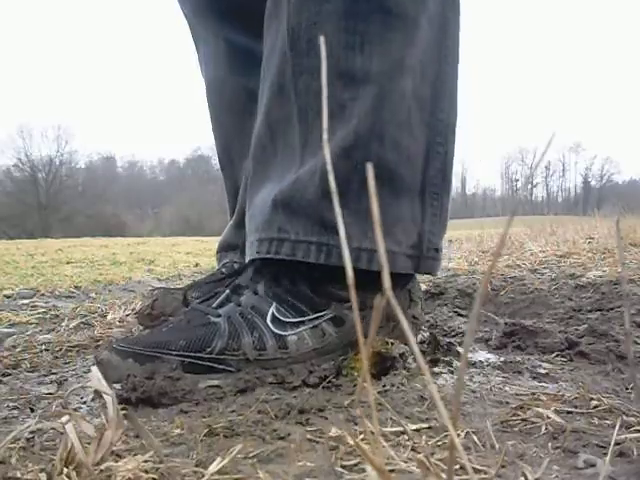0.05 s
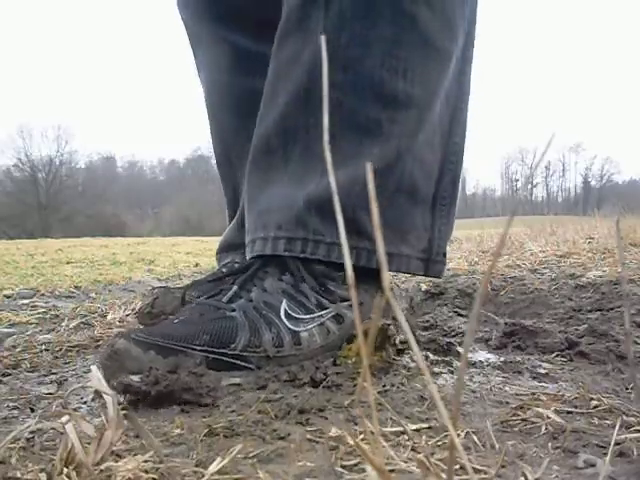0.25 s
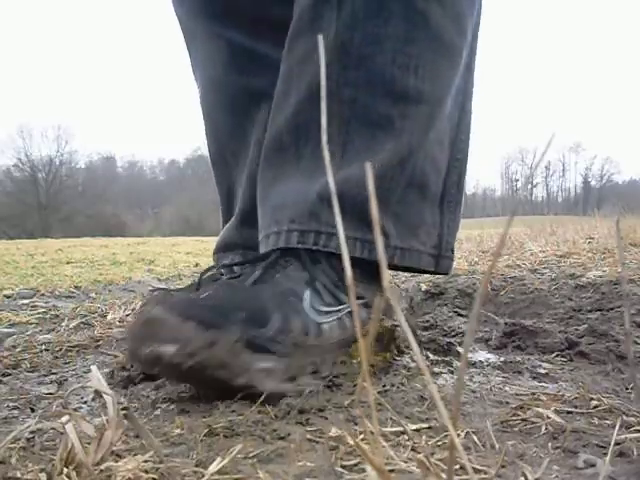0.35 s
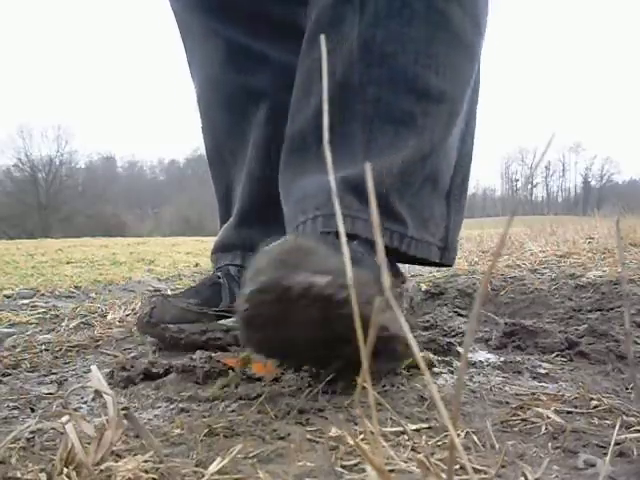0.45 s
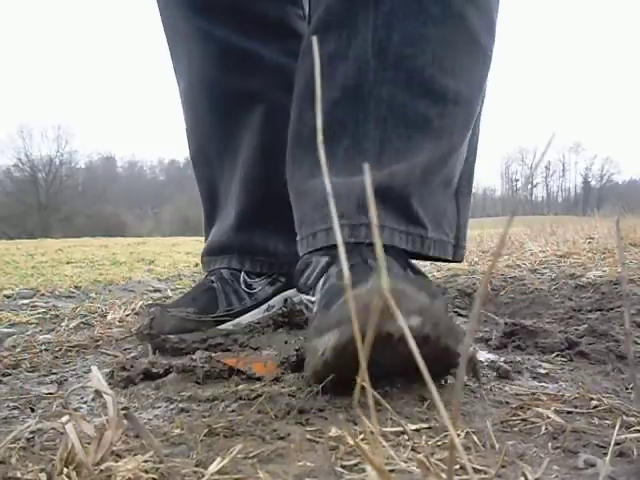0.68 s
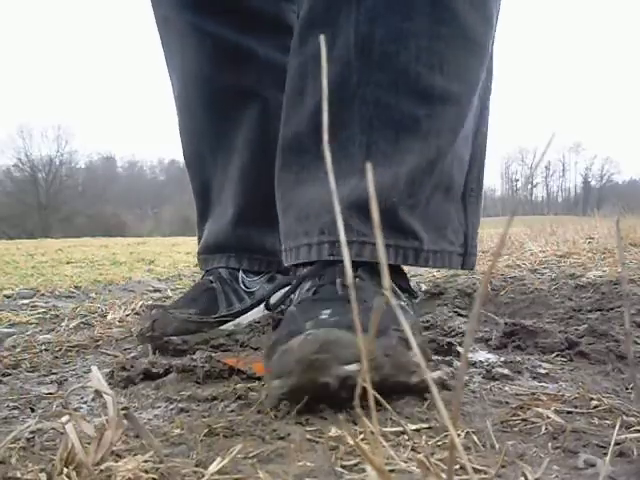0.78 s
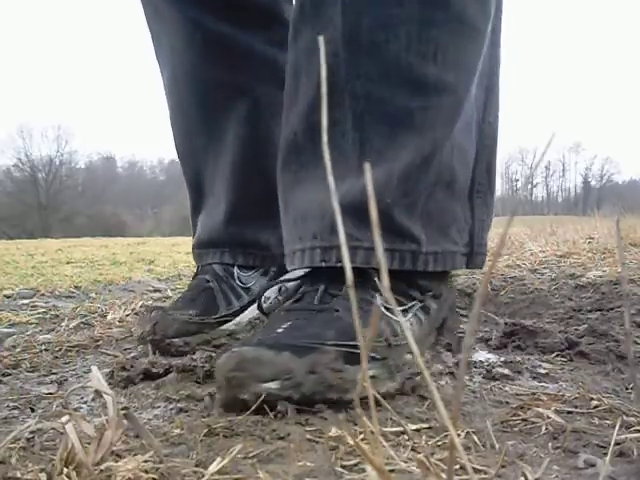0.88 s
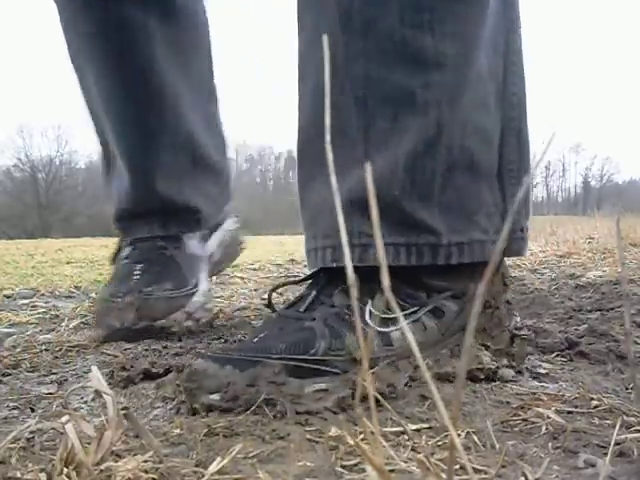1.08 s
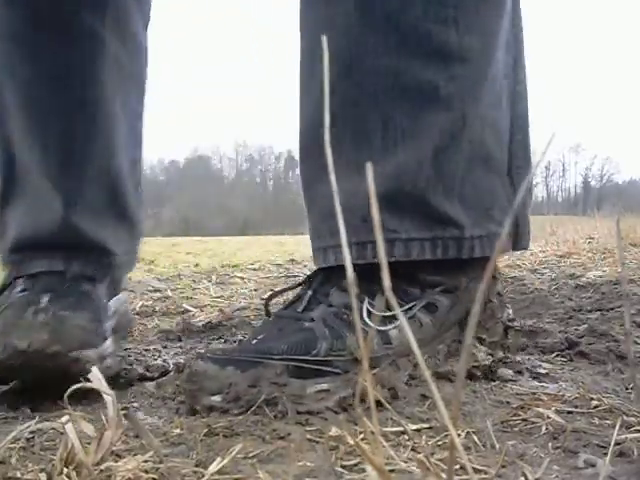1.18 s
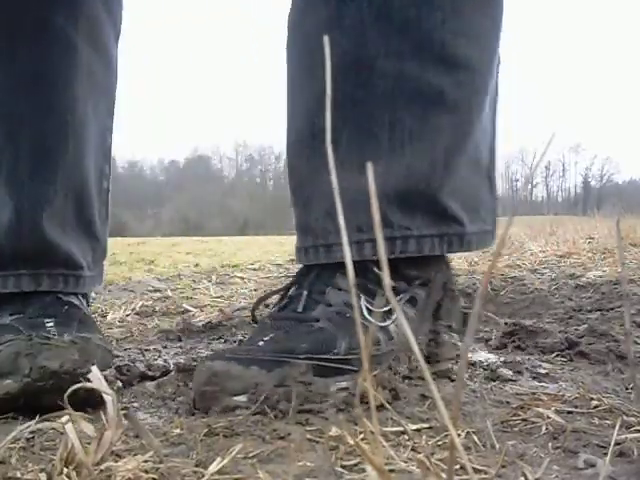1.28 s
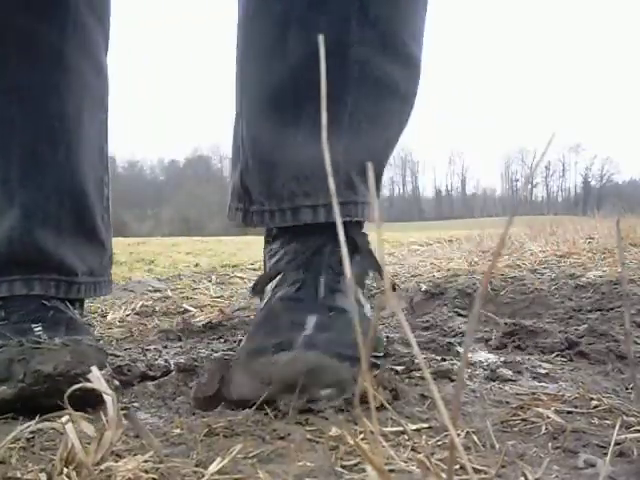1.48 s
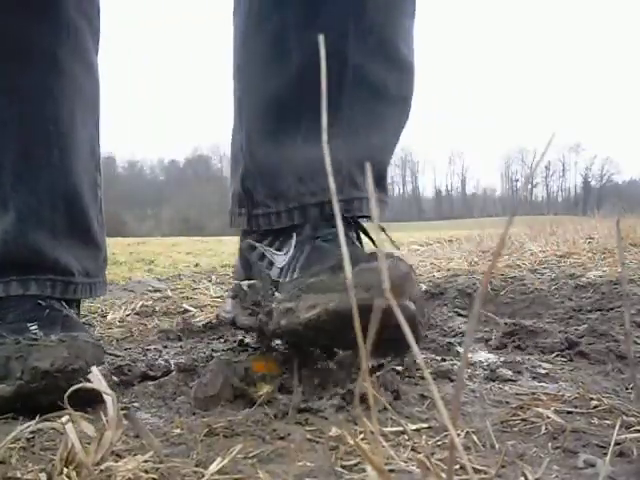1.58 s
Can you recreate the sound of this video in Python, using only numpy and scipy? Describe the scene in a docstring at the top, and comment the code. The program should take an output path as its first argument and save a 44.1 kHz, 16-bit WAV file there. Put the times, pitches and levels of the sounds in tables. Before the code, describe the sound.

Wet footsteps squelch in mud and dry grass, close by in an open field with no echo. A shoe peels loose with small pops from 0.2 to 0.4 seconds, then lands with the loudest squelch near 0.7. Stalks snap and soft thuds follow until about 1.2, and another crackly step comes around 1.4. Light wind rumbles throughout over a faint hiss and thin whine.

```python
"""Wet, sucking footsteps in mud and dry grass, close to a small camera in an open field.
One shoe peels out with pops of bursting air pockets, stamps down with a sharp squelch of tiny bubbles
and settles; then the other steps. Blades rub and stalks snap under the soles, the soft ground thuds,
and light wind rumbles over a faint hiss and whine."""
import sys
import numpy as np
from scipy.fft import rfft, irfft, next_fast_len
from scipy.io import wavfile

SR = 44100
rng = np.random.default_rng(int(sys.argv[2]) if len(sys.argv) > 2 else 0)


def inscribe(sig):
    """Save sig as 16-bit PCM at rate SR to the path in sys.argv[1].

    A 1-D sig is mono; a 2-D sig holds one channel per row.
    Samples are clipped to [-1, 1] before scaling.
    """
    pcm = np.round(np.clip(np.atleast_2d(sig).T, -1, 1) * 32767)
    wavfile.write(sys.argv[1], SR, pcm.astype(np.int16))


N = 72765


def mud():
    """Squeezed mud squelches in bursts of tiny bubbles; air pockets pop; trodden mud fizzes."""
    # bubble bursts under a sole (time [s], length [s], level [dB], pitch [Hz], spread [oct])
    squelches = [(.2168, 0.0035, -32.5, 2650, 0.9), (.2549, 0.0025, -33.5, 2300, 0.83),
                 (.2976, 0.0043, -35, 2720, 0.36), (.4183, 0.0055, -41, 3950, 1.2),
                 (.574, .016, -38, 3380, .75), (.641, 0.015, -41, 4670, 0.54),
                 (.648, 0.0043, -32.5, 3660, 0.82), (.6668, 0.00075, -18, 4950, 0.19),
                 (.6706, 0.0041, -22, 5040, 0.46), (.677, 0.0014, -21.5, 5250, 0.98),
                 (.681, 0.015, -39.5, 5130, 1), (.7038, 0.0064, -28.5, 4500, 0.69),
                 (.713, 0.0044, -35, 6130, 0.82), (.8985, .004, -46.5, 3130, 0.3),
                 (1.185, 0.0055, -42, 3130, 1.2)]
    # air pockets bursting (time [s], level [dB], pitch [Hz], decay [cycles])
    pops = [(0.0302, -34.5, 3880, 23), (0.071, -33, 4200, 7.7), (.107, -30.5, 2150, 4.3),
            (0.2074, -25.5, 2670, 5.9), (0.2161, -17.5, 1920, 5.4), (.248, -33, 4740, 20),
            (0.2557, -30, 3700, 3.5), (0.292, -31, 3280, 8.5), (0.3098, -27, 3300, 5.6),
            (0.3342, -31.5, 5200, 27), (0.3425, -34.5, 3420, 11), (0.3898, -21.5, 2970, 14),
            (0.4715, -33, 4760, 7.6), (0.567, -29.5, 3000, 17), (.661, -28.5, 4760, 5.4),
            (0.6693, -15.5, 3280, 7.3), (.6734, -14, 5700, 22), (.678, -18.5, 4500, 20),
            (.682, -17, 5760, 7.3), (0.6932, -25.5, 3870, 18), (0.6998, -21, 3870, 3.5),
            (0.8617, -23.5, 5400, 9.2), (0.873, -42.5, 2540, 42), (0.8872, -34, 5160, 9),
            (0.8957, -40, 2460, 24), (1.178, -29.5, 4600, 22), (1.3891, -39, 2350, 24),
            (1.3946, -26.5, 4770, 12), (1.398, -27, 5050, 8.4), (1.403, -35.5, 2280, 22)]
    # fizz of trodden mud (time [s], level [dB])
    fizz_db = [(0, -56.5), (.45, -58.5), (.5, -63), (.6, -54), (.85, -51.5), (.96, -68), (1.08, -64.5),
               (1.2, -64), (1.35, -56.5), (1.46, -62.5), (1.65, -68.5)]
    out = level(fizz_db) * grains(N, per_s=1000, hz=4340, octaves=0.75, cycles=8.5, scatter_db=5)
    out += bursts(squelches, per_s=4200, cycles=8.5, scatter_db=1, release_s=0.0007)
    for s, db, hz, cycles in pops:
        add(out, s, click(db, hz, cycles, crack=0.17))
    return out


def grass():
    """Blades rub under the soles and dry stalks snap."""
    # soles sliding on wet grass (time [s], length [s], level [dB], pitch [Hz], spread [oct])
    scuffs = [(.004, 0.0073, -50, 2280, 0.37), (.085, 0.032, -50.5, 3280, 1.25),
              (.162, 0.099, -51.5, 4000, 0.8), (.221, 0.012, -45, 2440, 0.76),
              (.257, 0.033, -54, 2720, 0.54), (.309, 0.045, -50.5, 2900, 0.53),
              (.3205, 0.007, -45.5, 5200, 0.072), (.365, 0.081, -53, 2690, 0.27),
              (.524, 0.021, -52, 2820, 0.3), (.5473, 0.0058, -43.5, 3100, 0.63),
              (.561, 0.013, -45, 2700, 0.6), (.591, 0.019, -45.5, 3500, 0.77),
              (.62, 0.095, -48, 4550, 0.86), (.72, 0.054, -50.5, 4000, 1.07),
              (.7595, 0.016, -46, 3900, 0.82), (.785, 0.057, -56.5, 5800, 0.99),
              (1.1, 0.056, -51, 5570, 0.85), (1.159, 0.041, -46.5, 4700, 0.26),
              (1.2, 0.062, -53.5, 4420, 0.9), (1.305, 0.082, -55, 6500, 0.83),
              (1.351, 0.056, -49, 5200, 0.95)]
    # stalks breaking (time [s], level [dB], pitch [Hz])
    snaps = [(.7094, -33, 7000), (0.7317, -19.5, 8150), (0.809, -23.5, 9350), (0.854, -27, 11000),
             (0.904, -35.5, 9200), (0.9133, -30.5, 6600), (0.9224, -35, 9000), (1.0327, -35, 6300),
             (1.103, -19.5, 7970), (1.3438, -28, 5800), (1.357, -24, 6700), (1.373, -26, 7440),
             (1.3875, -26.5, 6900), (1.4042, -28, 6500)]
    out = bursts(scuffs, per_s=1800, cycles=7, scatter_db=2, release_s=0.004)
    for s, db, hz in snaps:
        add(out, s, click(db, hz, cycles=5.1, crack=0.35))
    return out


def ground():
    """Dull squishes and soft thuds under the walker's weight."""
    # thick mud giving way (time [s], length [s], level [dB])
    squishes = [(0.209, 0.021, -49.5), (0.409, 0.005, -50), (0.642, 0.01, -49.5), (.666, 0.012, -48),
                (0.7037, 0.0074, -46), (0.749, 0.054, -58.5), (1.196, 0.052, -62.5), (1.363, .024, -56.5)]
    # weight shifting onto soft ground (time [s], peak [dB], pitch [Hz])
    thuds = [(0.115, -39.5, 115), (0.207, -42, 46.3), (0.27, -38, 36.8), (0.369, -39.5, 65),
             (0.41, -32, 103), (0.887, -40.5, 67), (0.963, -34, 74), (.976, -40, 100), (1.074, -40.5, 146),
             (1.144, -36, 110)]
    out = np.zeros(N)
    for s, length_s, db in squishes:
        env = swell(length_s, attack_s=0.0026, release_s=0.011)
        add(out, s, amp(db) * env * band(len(env), hz=593, octaves=0.46, skirt_db=-35.5))
    t = np.arange(SR // 8) / SR
    for s, db, hz in thuds:
        decay = np.exp(-np.log(1000) * hz * t / 1.6)  # 60 dB in 1.6 cycles
        push = np.sin(2 * np.pi * hz * t) * decay * (1 - np.exp(-4 * hz * t))
        add(out, s, -amp(db) * push / np.abs(push).max())
    return out


def wind():
    """Light wind rumbles on the microphone."""
    # gusts (time [s], level [dB])
    gusts_db = [(0, -46.5), (.12, -53.5), (.34, -51), (.46, -51.5), (.55, -55.5), (.85, -54), (.98, -49.5),
                (1.1, -52.5), (1.22, -47), (1.35, -58), (1.45, -53), (1.52, -52.5), (1.58, -49),
                (1.65, -50)]
    # rumble spectrum (frequency [Hz], relative level [dB])
    rumble_db = [(15, -5.5), (30, 2.5), (50, 2), (75, -1.5), (120, -1), (200, -10.5), (350, -17),
                 (700, -25.5), (1300, -35), (4000, -62)]
    return level(gusts_db) * noise(rumble_db)


def hiss_and_whine():
    """Steady hiss and the camera's thin whine."""
    # hiss spectrum (frequency [Hz], relative level [dB])
    hiss_db = [(100, 14), (700, 11.5), (1400, 3.5), (3000, -1.5), (7000, -3), (15000, -4)]
    whine_hz = 15735
    whine = np.sqrt(2) * np.sin(2 * np.pi * whine_hz * np.arange(N) / SR)
    return amp(-59.5) * noise(hiss_db) + amp(-70) * whine


def bursts(rows, per_s, cycles, scatter_db, release_s):
    """One cloud of grains per row, over a little wet hiss."""
    out = np.zeros(N)
    for s, length_s, db, hz, octaves in rows:
        env = swell(length_s, release_s / 4, release_s)
        cloud = grains(len(env), per_s, hz, octaves, cycles, scatter_db)
        wet_hiss = 0.45 * band(len(env), hz, octaves, skirt_db=-24)
        burst = env * (cloud + wet_hiss)
        add(out, s, amp(db) * burst * np.sqrt(length_s * SR / np.sum(burst ** 2)))
    return out


def grains(n, per_s, hz, octaves, cycles, scatter_db):
    """Tiny ringing grains of random pitch and size, rms 1."""
    count = max(2, int(per_s * n / SR))
    size, pitch, slip = rng.spawn(1)[0].standard_normal((count, 3)).T
    start = np.abs((np.arange(count) + slip / 2) * SR / per_s).astype(int)
    grain_hz = np.clip(hz * 2 ** (octaves * pitch), 200, 20000)[:, None]
    gain = amp(scatter_db * np.minimum(size, 2)) * np.sign(slip)
    age = np.arange(300)
    waves = gain[:, None] * np.sqrt(grain_hz / hz) * ring(grain_hz * age / SR, cycles)
    return unit(np.bincount((start[:, None] + age).ravel(), waves.ravel(), n)[:n])


def click(db, hz, cycles, crack):
    """Short ring with a noisy crack centred just above its pitch."""
    turns = hz * np.arange(512) / SR
    crack_noise = band(len(turns), 1.3 * hz, octaves=0.53, skirt_db=-15.5)
    x = ring(turns, cycles) + crack * crack_noise * fade(turns, cycles)
    return amp(db) * x / np.abs(x).max()


def ring(turns, cycles):
    """Damped sine."""
    return np.sin(2 * np.pi * turns) * fade(turns, cycles)


def fade(turns, cycles, onset_cycles=0.18):
    """Soft onset of a wet contact, then 60 dB of decay over `cycles`."""
    return np.exp(-np.log(1000) * turns / cycles) * (1 - np.exp(-turns / onset_cycles)) ** 2


def swell(length_s, attack_s, release_s):
    """Attack, hold and release of one burst."""
    t = np.arange(int((length_s + 5 * release_s) * SR)) / SR
    return (1 - np.exp(-t / attack_s)) * np.exp(-np.maximum(t - length_s, 0) / release_s)


def band(n, hz, octaves, skirt_db):
    """Bell-shaped noise band on a flat skirt, rms 1."""
    def gain(f):
        bell = np.exp(-(np.log2((f + 1) / hz) / octaves / 2) ** 2)
        return bell * np.sqrt(hz / (f + hz / 2)) + amp(skirt_db)
    return unit(coloured(rng.spawn(1)[0].standard_normal(n), gain))


def noise(spectrum):
    """Noise shaped by (Hz, dB) points, rms 1."""
    return unit(coloured(rng.standard_normal(N), response(spectrum)))


def coloured(x, gain):
    """Minimum-phase filter with magnitude gain(Hz)."""
    m = 2 * next_fast_len(len(x) + 1024)
    magnitude = np.maximum(gain(np.fft.rfftfreq(m, 1 / SR)), 1e-6)
    cepstrum = irfft(np.log(magnitude))
    cepstrum[1:m // 2] *= 2
    cepstrum[m // 2 + 1:] = 0
    return irfft(rfft(x, m) * np.exp(rfft(cepstrum)))[:len(x)]


def response(points):
    """Gain function through (Hz, dB) points on a log axis."""
    hz, db = np.transpose(points)
    return lambda f: amp(np.interp(np.log(f + 1), np.log(hz + 1), db))


def level(points):
    """Gain per sample from (s, dB) points."""
    return amp(np.interp(np.arange(N) / SR, *np.transpose(points)))


def add(out, s, x):
    """Mix x into out at time s."""
    i = max(0, round(s * SR))
    out[i:i + len(x)] += x[:max(0, len(out) - i)]


def amp(db):
    """Decibels to gain."""
    return 10 ** (np.asarray(db) / 20)


def unit(x):
    """Scale to rms 1."""
    return x / np.sqrt(np.mean(x ** 2) + 1e-20)


def scene():
    """Steps in the open air, mono, no echo."""
    # tone colour applied to mud and grass (frequency [Hz], gain [dB])
    colour_db = [(200, -17), (450, -2), (850, -6.5), (1250, -15), (2000, -0.5), (3000, -0.5), (6000, -1.5),
                 (10000, 0.5), (16000, -1.5)]
    crunch = coloured(mud() + grass(), response(colour_db))
    return (crunch + ground() + wind() + hiss_and_whine())[None]


def record(dry):
    """The camera passes nothing above its band limit."""
    top_hz = 16300
    m = next_fast_len(N + SR // 2)
    passband = np.fft.rfftfreq(m, 1 / SR) < top_hz
    return irfft(rfft(dry, m) * passband, m)[..., :N]


dry = scene()
out = record(dry)
inscribe(out)
```